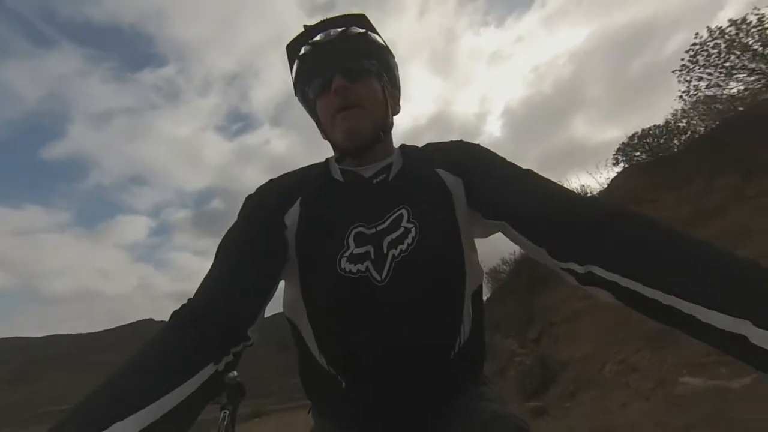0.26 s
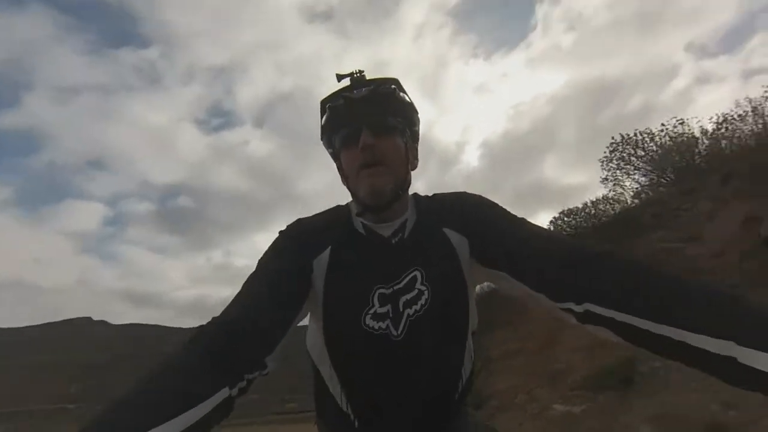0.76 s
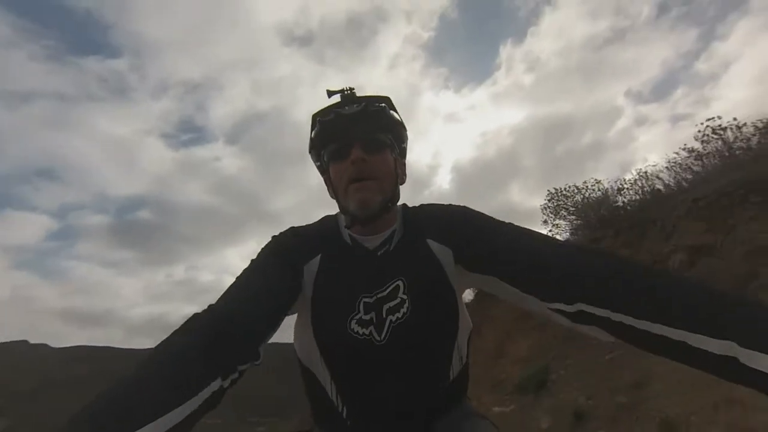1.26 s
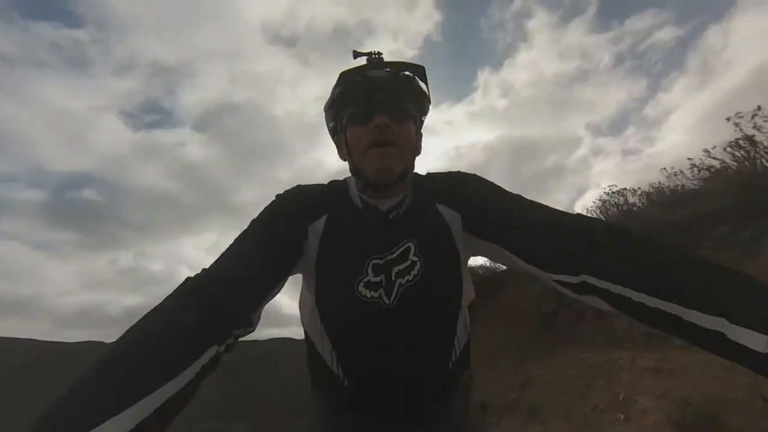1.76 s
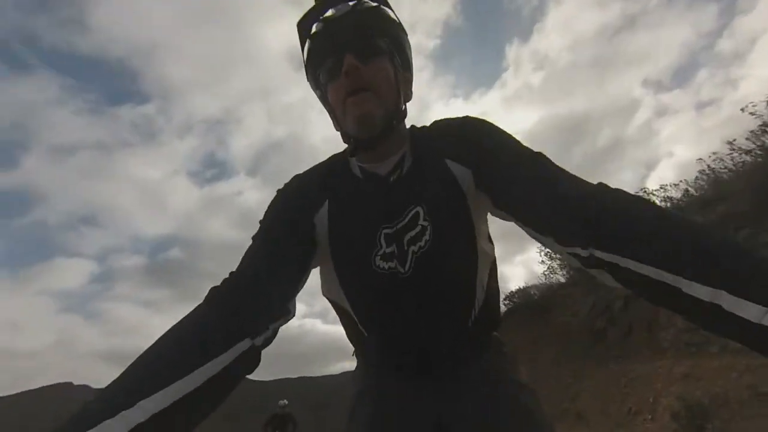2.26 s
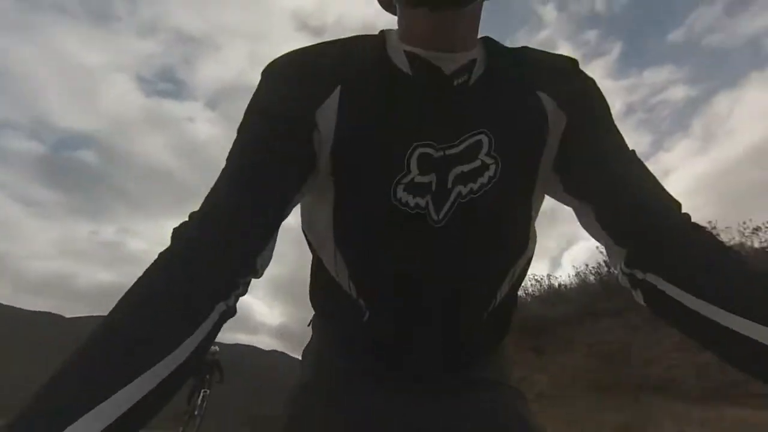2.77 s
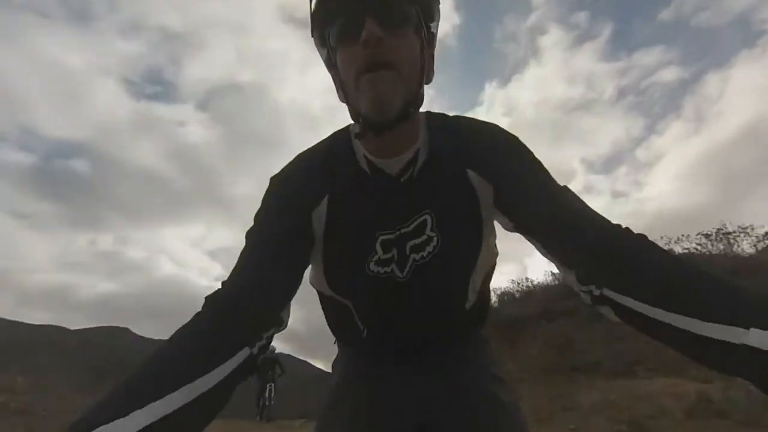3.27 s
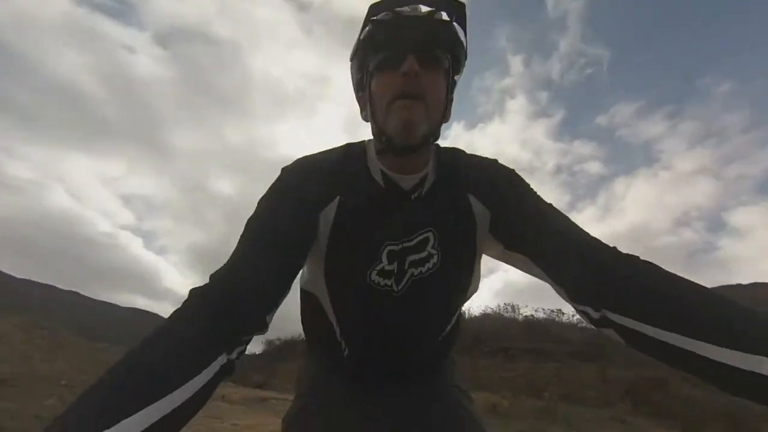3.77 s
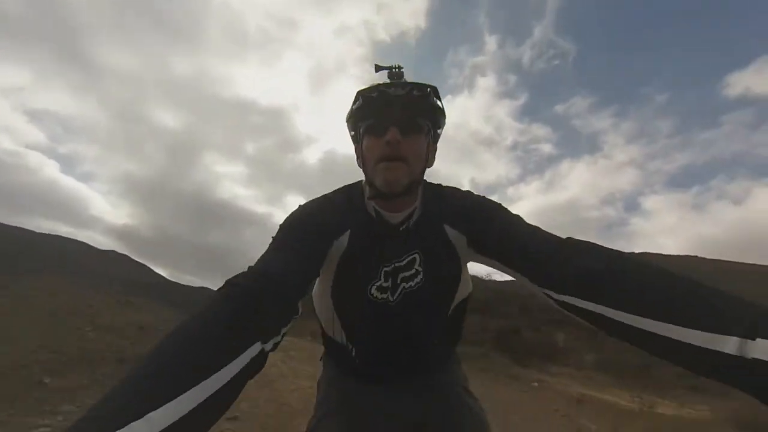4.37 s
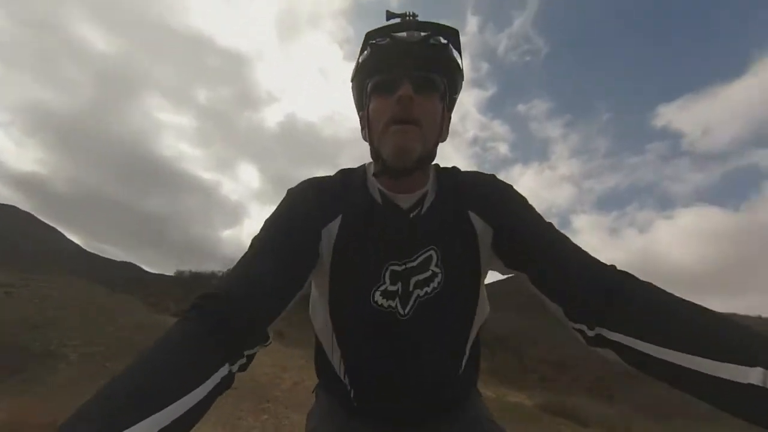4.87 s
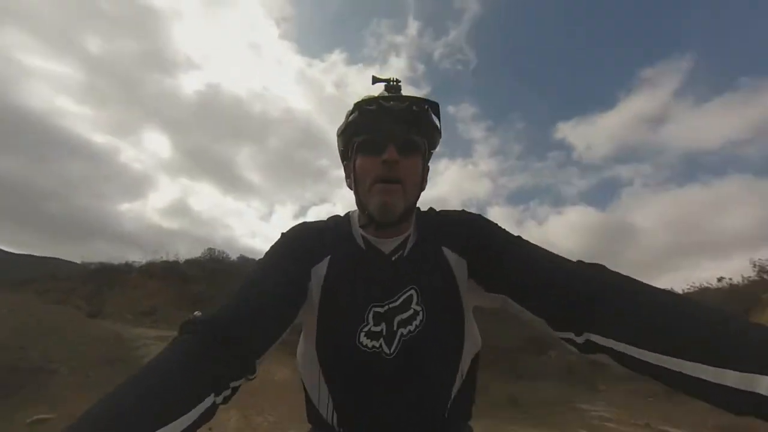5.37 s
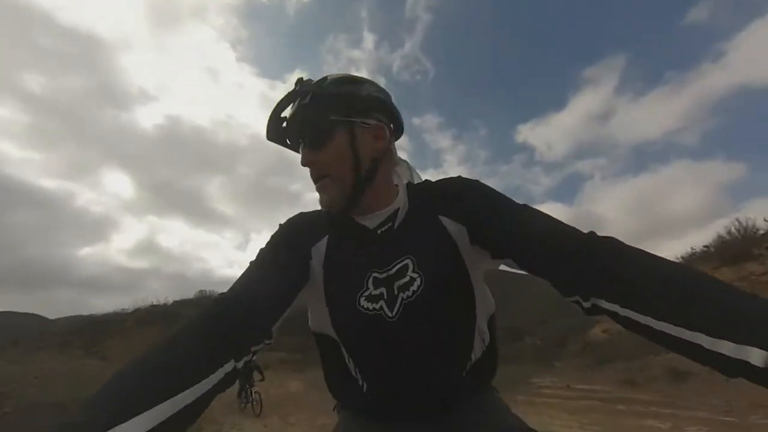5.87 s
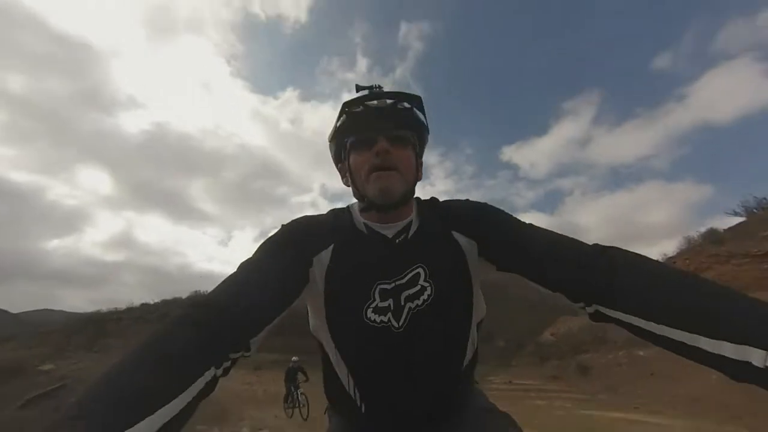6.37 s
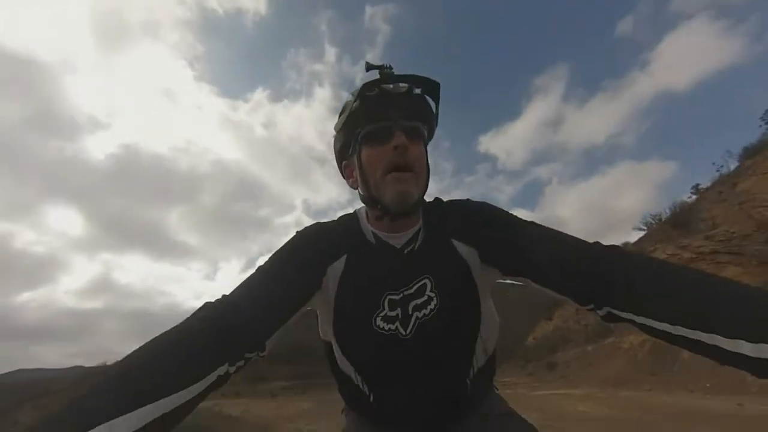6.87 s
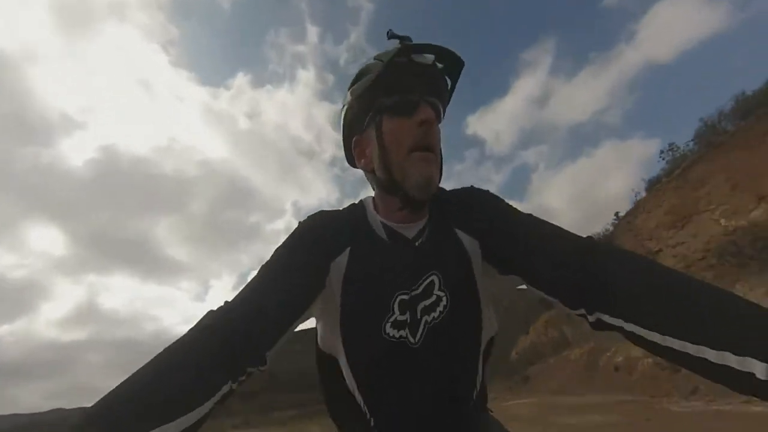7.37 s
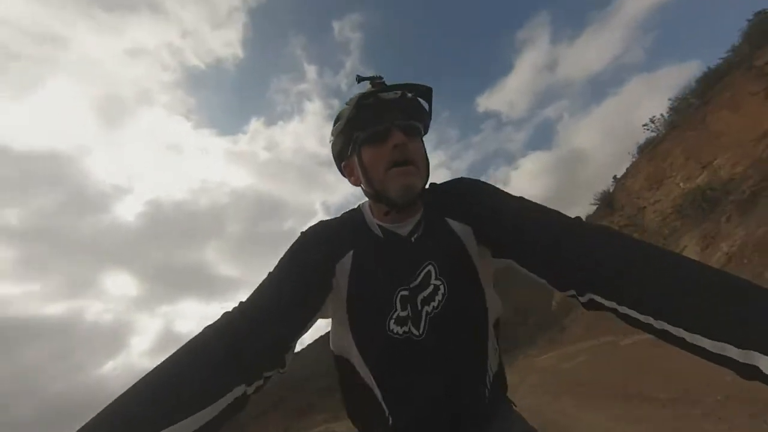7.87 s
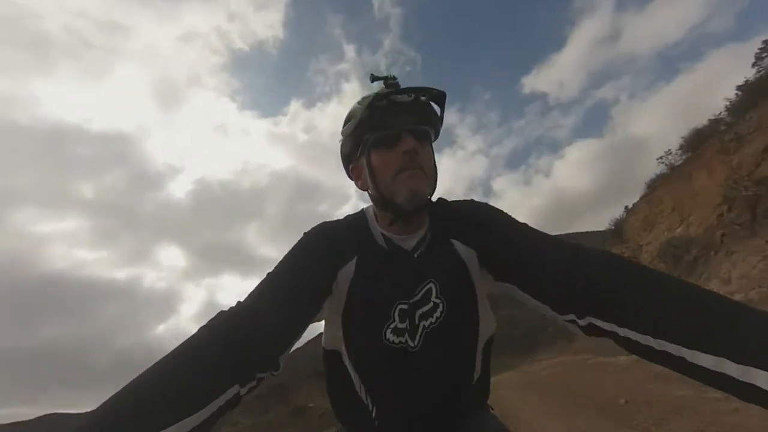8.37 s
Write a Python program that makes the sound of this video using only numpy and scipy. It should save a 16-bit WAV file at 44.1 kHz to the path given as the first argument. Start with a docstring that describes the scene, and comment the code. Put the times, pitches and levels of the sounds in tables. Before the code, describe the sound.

After a quiet rattling start, a bumpy bike ride turns into harsh, close plastic knocking and clattering, with dull thuds and tiny ticks.

```python
"""Hard knocks of a camera, loose in its plastic housing on a bicycle handlebar, about one per sway of the mount:
impulse pairs ring the shell's modes. The ride over rough ground starts gently with noise-driven rattle and
sway of the mount, and light contacts that ring small parts. Dull thuds (short swelling sines), taps of a
corner and ticks of a latch (crackles that ring stiff modes) accompany the knocks; the loudest peaks clip."""
import sys
import numpy as np
from scipy import signal
from scipy.io import wavfile
from scipy.ndimage import uniform_filter1d

SR = 44100
rng = np.random.default_rng(int(sys.argv[2]) if len(sys.argv) > 2 else 0)


def generate_wav(sig):
    """Save sig (samples, or channels by samples) to the path in sys.argv[1] as 16-bit PCM at SR."""
    pcm = np.round(np.clip(np.atleast_2d(sig).T, -1, 1) * 32767).astype(np.int16)
    wavfile.write(sys.argv[1], SR, pcm)


N = 380583  # samples


def undb(db):
    """Level law: decibels to an amplitude ratio."""
    return 10 ** (np.asarray(db) / 20)


def unit(x):
    """Normalisation to an effective (RMS) value of 1."""
    return x / np.sqrt(np.mean(x ** 2))


def ring(x, hz, t60):
    """Modal decay: a damped oscillator in sine phase, driven by x, falls 60 dB in t60 seconds."""
    pole = np.exp(2j * np.pi * hz / SR - np.log(1000) / (t60 * SR))
    return signal.lfilter([0, pole.imag], [1, -2 * pole.real, abs(pole) ** 2], x)


def band(x, hz, width):
    """Resonance: a band-pass peak applied twice."""
    b, a = signal.iirpeak(hz, hz / width, SR)
    return signal.lfilter(b, a, signal.lfilter(b, a, x))


def blows(seconds, size):
    """Impulsive excitation: each impulse is shared between two samples to place it between them."""
    out = np.zeros(N + 2)
    place = np.clip(seconds * SR, 0, N)
    whole = place.astype(int)
    np.add.at(out, whole, size * (1 - place + whole))
    np.add.at(out, whole + 1, size * (place - whole))
    return out[:N]


def walk(rate):
    """Slow random modulation: levels held for 1 / rate seconds, smoothed twice, with spread 1."""
    hold = int(SR / rate)
    steps = np.repeat(rng.standard_normal(N // hold + 1), hold)[:N]
    return unit(uniform_filter1d(uniform_filter1d(steps, hold), hold))


def struck(seconds, size, modes, scatter_db, crack_s):
    """Modal excitation: every blow is a brief crackle that rings the same modes in a different mix."""
    mix = undb(scatter_db * rng.standard_normal((len(seconds), len(modes))))
    fade = np.exp(-1 / (crack_s * SR))
    grit = 0.33 * rng.standard_normal(N)
    out = 0
    for k, (hz, db, t60) in enumerate(modes):
        hit = blows(seconds, size * undb(db) * mix[:, k])
        crackle = grit * signal.lfilter([0, 1], [1, -fade], hit)
        out = out + (-1) ** k * ring(hit + crackle, hz, t60)
    return out


DELAY_SPREAD_S, TAKEN_S = 0.001, 0.008  # a listed event this near takes the place of a companion


def company(listed, delay_s, rule, least_db, pause_s, next_s):
    """Coupled impacts: listed events, plus a companion to each strong knock that has none listed.

    A companion needs a knock above least_db, more than pause_s after the last and under next_s before the next."""
    s, db = np.transpose(KNOCKS)
    base_db, slope, spread_db = rule
    chance = rng.standard_normal((2, len(s)))
    rows = np.array(listed)
    at = s + delay_s
    rested = np.diff(s, prepend=0) > pause_s
    followed = np.diff(s, append=N / SR) < next_s
    unlisted = np.abs(at[:, None] - rows[:, 0]).min(axis=1) > TAKEN_S
    free = (db > least_db) & rested & followed & unlisted
    level_db = base_db + slope * db + spread_db * chance[1]
    start_s = at + DELAY_SPREAD_S * chance[0]
    return np.r_[rows[:, 0], start_s[free]], np.r_[rows[:, 1], level_db[free]]


# shaking by the ground, a curve through points: start_s, level_db
GROUND = [(0.0, -45), (0.17, -52.5), (0.41, -45), (0.96, -51.5), (1.12, -42.5), (1.58, -45.5),
          (2.01, -39.5), (2.21, -41.5), (2.73, -34.5), (2.89, -39.5), (3.3, -33.5), (3.95, -34),
          (4.13, -36.5), (4.37, -33.5), (4.78, -37), (5.22, -32.5), (5.64, -35.5), (5.79, -31.5),
          (6.87, -36), (8.63, -36.5)]


def ground_shaking():
    """Level envelope: the shaking that drives rattle and light contacts, interpolated in decibels."""
    return np.interp(np.arange(N) / SR, *np.transpose(GROUND))


# clearest scrapes of the light rattle: start_s, level_db
SCRAPES = [(0.02, -40), (0.393, -23), (0.423, -27), (0.545, -31.5), (0.608, -27), (0.702, -29.5),
           (0.854, -26), (1.082, -23), (1.114, -23.5), (1.141, -24.2), (1.2, -25.5), (1.268, -28),
           (1.32, -25.5), (1.442, -15.5), (1.512, -24), (1.631, -22.5), (1.643, -21.5), (1.945, -25.5),
           (2.584, -22), (2.816, -21.5), (3.944, -17.5), (4.402, -16), (4.532, -19), (4.849, -21),
           (4.877, -22.5), (5.785, -23), (6.163, -19), (7.576, -17)]
# resonances the light rattle excites: pitch_hz, width_hz, level_db, scatter_db (between scrapes)
RATTLE = [(71, 65, -9.5, 0.5), (135, 89, -8, -1), (312, 280, -3.5, -2), (526.6, 208, 0, 4.5),
          (859, 310, -10, 4.5), (1055, 310, -20, 9.5), (1820, 800, -35.5, 10.5), (2700, 1520, -22.5, 5.5),
          (4230, 1800, -41, 4), (7500, 6200, -45, 1), (11500, 4700, -53, 8.5)]
RATTLE_PER_S = 300
STIR_DB, STIR_S = 3.0, 0.11  # limit of the rise around knocks, and its window
ROLLING_DB = -58  # least drive, from the rolling tyres


def rattle(level_db):
    """Resonance under random excitation: scrape bursts and an even buzz of noise drive the shell.

    Knocks stir the rattle up around them, but it dips after a hard knock seats the camera."""
    s, db = np.transpose(KNOCKS)
    knock = blows(s, undb(db))
    seated = signal.lfilter([1], [1, -np.exp(-1 / (0.031 * SR))], knock)
    stirred = uniform_filter1d(knock, int(STIR_S * SR)) * STIR_S * SR
    busy = undb(level_db + STIR_DB * np.tanh(stirred) - 7.2 * np.minimum(seated, 1))
    surge = walk(30)

    count = int(RATTLE_PER_S * N / SR)
    small_s = rng.random(count) * N / SR
    small = undb(2.5 * np.minimum(rng.exponential(size=count), 3.0)) * busy[(small_s * SR).astype(int)]
    clear_s, clear_db = np.transpose(SCRAPES)
    seconds = np.r_[small_s, clear_s - 0.002, s]  # each knock leaves grit too
    size = np.r_[small, undb(clear_db), undb(db - 19)]

    colour = rng.standard_normal((len(seconds), len(RATTLE)))
    rise, fall = np.exp(-1 / (0.0019 * SR)), np.exp(-1 / (0.0031 * SR))
    out = 0
    for k, (hz, width, band_db, scatter_db) in enumerate(RATTLE):
        power = blows(seconds, (size * undb(scatter_db * colour[:, k])) ** 2)
        power = signal.lfilter([1], [1, -fall ** 2], power)
        power = signal.lfilter([1 - rise], [1, -rise], power)
        drive = np.sqrt(power + (0.63 * busy) ** 2)  # scrapes over the even buzz
        # the treble comes and goes the most
        drive = drive * undb(surge * (0.8 + 0.9 * np.log2(1 + hz / 410.0)))
        drive = np.hypot(drive, undb(ROLLING_DB)) * rng.standard_normal(N)
        out = out + undb(band_db) * np.sqrt(SR / width / 2) * band(drive, hz, width)
    return out


# swing of the mount, a curve through points: start_s, level_db
SWAY = [(0, -41), (1.85, -39), (2.69, -36.5), (2.95, -46), (3.03, -33), (4.18, -37), (4.59, -31),
        (4.85, -41.5), (5.02, -30.5), (6.13, -39.5), (6.85, -35), (7.33, -32), (7.64, -32), (8.63, -41)]
SWAY_HZ, SWAY_WIDTH_HZ = 31.4, 14.3


def sway_level():
    """Level envelope: the swing of the mount, interpolated in decibels."""
    return np.interp(np.arange(N) / SR, *np.transpose(SWAY))


def sway(level_db):
    """Forced resonance: the mount, pushed by the ground, swings at its own low pitch."""
    return unit(band(rng.standard_normal(N), SWAY_HZ, SWAY_WIDTH_HZ)) * undb(level_db)


def hiss():
    """White noise floor: the steady hiss of the microphone."""
    return undb(-84) * rng.standard_normal(N)


# clearest light contacts while the ride is still gentle: start_s, level_db
CONTACTS = [(0.0444, -49), (0.0628, -46), (0.1605, -48), (0.2853, -46), (0.4998, -50), (0.5824, -50),
            (0.7444, -52), (0.8844, -54), (1.0244, -52), (1.2844, -43), (1.3049, -45), (1.3533, -48),
            (1.6944, -41), (1.7868, -48), (1.8544, -43), (1.8701, -43), (1.9335, -39), (1.9694, -48),
            (1.9889, -42), (2.0168, -44), (2.0344, -47), (2.0844, -47), (2.1196, -48), (2.359, -44),
            (2.8055, -38.5)]
# modes the light contacts ring: pitch_hz, level_db, t60_s
LIGHT = [(1950, -9.5, .006), (2670, -4.5, 0.01), (3208, -3, 0.013), (4270, -9, 0.0058),
         (5230, -10.5, 0.0045)]
CHATTER_PER_S = 63  # two per sway
CHATTER_DB, CHATTER_SWELL_DB, CHATTER_SPREAD_DB = -13.0, 3.0, 4.0  # against the shaking


def light_contacts(level_db):
    """Modal ringing under repeated impact: unevenly timed small contacts swell and fade with the ground."""
    count = int(CHATTER_PER_S * N / SR) - 1
    chance = rng.standard_normal((2, count))
    jitter = np.clip(0.3 * chance[0], -0.5, 0.5)
    light_s = (np.arange(count) + 0.5 + jitter) / CHATTER_PER_S
    swell_db = level_db + CHATTER_SWELL_DB * walk(10)
    light_db = swell_db[(light_s * SR).astype(int)] + CHATTER_DB + CHATTER_SPREAD_DB * chance[1]
    clear_s, clear_db = np.transpose(CONTACTS)
    seconds, size = np.r_[clear_s, light_s], undb(np.r_[clear_db, light_db])
    return struck(seconds, size, LIGHT, scatter_db=3.0, crack_s=0.00052)


# loudest and lone dull landings and short rings of the shell: start_s, level_db, pitch_hz
THUDS = [(2.264, -16.5, 887), (2.412, -13.5, 280), (2.657, -15, 854), (2.711, -15.5, 830),
         (3.008, -10.5, 610), (3.313, -17.5, 915), (3.576, -17.5, 850), (3.63, -9.5, 246),
         (3.912, -12.5, 233), (3.961, -10, 270), (4.474, -9, 256), (4.592, -5, 238), (4.966, -16.9, 190),
         (5.036, -8.5, 220), (5.237, -19, 180), (5.549, -12, 179), (5.956, -6.5, 260), (6.023, -18.5, 830),
         (6.058, -18.5, 298), (6.096, -10, 272), (6.132, -15.5, 290), (6.176, -12.5, 213),
         (6.338, -18.5, 910), (6.35, -14.5, 148), (6.561, -10.5, 150), (7.137, -10, 170), (7.299, -11, 189),
         (7.356, -10.5, 204), (8.605, -11.0, 227)]
# companions: level_db after a 0 dB knock, dB per dB of knock, spread_db
THUD_RULE = (-16.5, 0.43, 3.2)
THUD_HZ, THUD_HZ_SPREAD = 205, 0.18  # centre and log spread of the companions' pitch


def thuds():
    """Heavily damped oscillation: soft landings, mostly just ahead of firm knocks, swell and die in milliseconds."""
    s, db = company(THUDS, -0.0125, THUD_RULE, least_db=-9.7, pause_s=0, next_s=np.inf)
    loose_hz = THUD_HZ * np.exp(THUD_HZ_SPREAD * rng.standard_normal(len(KNOCKS)))
    hz = np.r_[np.array(THUDS)[:, 2], loose_hz]
    t = np.arange(1000) / SR
    rise_s = 0.0017
    shape = t / rise_s * np.exp(1 - t / rise_s)
    out = np.zeros(N + len(t))
    for start, size, f in zip((s * SR).astype(int), undb(db), hz):
        out[start:start + len(t)] += size * shape * np.sin(2 * np.pi * f * t)
    return out[:N]


# loudest and lone pitched taps of a corner of the camera: start_s, level_db
TAPS = [(1.4501, -23.5), (2.2836, -23.5), (2.7301, -22), (3.5059, -27.5), (5.0043, -21), (5.1347, -22),
        (5.1732, -26), (7.357, -25.5), (8.0198, -23.5)]
# modes of that corner: pitch_hz, level_db, t60_s
CORNER = [(1855, -0.5, 0.015), (5240, -2.5, 0.0062), (11200, -16, .004)]
# companions: level_db after a 0 dB knock, dB per dB of knock, spread_db
TAP_RULE = (-29, 0.7, 3.1)


def corner_taps():
    """Modal ringing of a stiff part: a corner taps, also just ahead of hard knocks that follow a pause."""
    s, db = company(TAPS, -0.011, TAP_RULE, least_db=-6, pause_s=0.036, next_s=np.inf)
    return struck(s, undb(db), CORNER, scatter_db=1.0, crack_s=0.00023)


# hard knocks of the camera on the shell: start_s, level_db
KNOCKS = [(1.4605, -2), (1.4909, -15), (1.526, -4.5), (2.17, -16.5), (2.294, -2.5), (2.3188, -15.5),
          (2.4293, 1.3), (2.4649, -1.2), (2.498, -8), (2.5319, -2.5), (2.5634, -10.5), (2.7001, -14),
          (2.7381, -3.5), (3.022, 2), (3.1109, -4.5), (3.1742, -11.5), (3.2074, -2.5), (3.2502, -5),
          (3.284, -11), (3.3594, -18), (3.3736, -6), (3.4058, -7), (3.5153, -1.1), (3.547, -1.5),
          (3.6413, -13), (3.8636, -11), (3.926, -4.5), (3.9745, -5.5), (4.0548, -8.5), (4.211, -1),
          (4.243, -10), (4.3594, -13), (4.3924, -16.5), (4.4465, -3), (4.48, -4), (4.5704, -9),
          (4.6054, 0.7), (4.6387, -5.5), (4.6701, -4.5), (4.7028, -3.5), (4.7388, -6.5), (4.9992, -16),
          (5.014, -1.5), (5.0485, -2), (5.0777, -24), (5.1114, -0.9), (5.147, -7), (5.181, -5.5),
          (5.2142, -4), (5.2719, -7), (5.3628, -17), (5.4654, -2.5), (5.495, -8), (5.5277, 3),
          (5.5599, -3.5), (5.59, -12), (5.6235, -9.5), (5.7525, -8.5), (5.854, -3), (5.8782, -18),
          (5.974, 3), (6.007, -13), (6.1524, -19), (6.1931, 2.5), (6.3655, 4.2), (6.4196, -8),
          (6.4531, -10), (6.541, -5.5), (6.5769, -0.6), (6.8972, -14.5), (6.929, -11.5), (6.9938, -15.5),
          (7.1157, -10.5), (7.1472, 1), (7.1765, -0.2), (7.2368, 0.5), (7.262, -17), (7.2741, -2),
          (7.3082, -7.5), (7.3352, -11.5), (7.371, -1.5), (7.401, -0.5), (7.4371, -3), (7.5591, -5),
          (7.5926, -5.5), (7.626, -14), (7.8808, -16), (7.9433, -9), (8.0288, -2.3), (8.0624, -11.5),
          (8.1848, -14.5), (8.2233, -12.5), (8.3424, -18), (8.3735, -10.5), (8.4072, -3), (8.438, -15),
          (8.6193, -2.5)]
# modes of the shell: pitch_hz, level_db, t60_s, sign (at the microphone)
SHELL = [(215, 3, 0.0048, 1), (469, 0.5, 0.01, 1), (680, -24.5, 0.02, -1), (929, -8.5, 0.014, -1),
         (1224, -10.5, 0.019, -1), (1878, -2.5, 0.0042, -1), (2540, 4.5, 0.0024, 1), (2651, 0, 0.006, -1),
         (3000, -11, 0.0043, 1), (4150, -3.5, 0.007, -1), (4280, -19.5, 0.0022, 1)]
# bright treble modes of a hard edge, heard with each knock: pitch_hz, level_db, t60_s
EDGE = [(6110, -4, 0.0051), (7200, -2.5, 0.0052), (8300, -7, 0.0044), (10030, -1, 0.0035),
        (11600, 5, 0.0024), (13120, -0.5, 0.0024)]
CONTACT_S, RELEASE = 0.00094, 0.78  # mean contact time, and release against landing
SOFTNESS = 0.8743  # pole of the smoothing filter
SWAY_KICK_DB, SWAY_T60_S = -35, 0.066


def knocks():
    """Impact and release: paired impulses ring the shell; harder blows are brighter and kick the mount."""
    s, db = np.transpose(KNOCKS)
    mix = undb(1.14 * rng.standard_normal((len(s), len(SHELL))))
    contact_s = CONTACT_S * (1 + 0.039 * rng.standard_normal(len(s)))
    shell = 0
    for k, (hz, mode_db, t60, sign) in enumerate(SHELL):
        size = undb(db + mode_db) * mix[:, k] * np.sign(sign)
        push = blows(s, size) - RELEASE * blows(s + contact_s, size)
        shell = shell + ring(push, hz, t60)
    shell = signal.lfilter([1 - SOFTNESS], [1, -SOFTNESS], shell)  # plastic on plastic: a rounded push
    edge = struck(s + 0.0001972, undb(2.14 * db - 22.5), EDGE, scatter_db=3.0, crack_s=0.00024)
    mount = ring(blows(s, undb(db + SWAY_KICK_DB)), SWAY_HZ, SWAY_T60_S)
    # the shell is pulled the other way while the camera flies towards it: a decay run backwards
    fall = np.exp(-1 / (0.0059 * SR))
    pull = signal.lfilter([1], [1, -fall], blows(s, undb(db - 18.5))[::-1])[::-1]
    return shell + edge + mount - pull


# loudest and lone ticks of the latch: start_s, level_db
TICKS = [(2.72, -27), (3.231, -20.5), (3.6193, -22), (3.9547, -25.0), (4.5876, -20.5), (6.166, -25.5),
         (6.2109, -28), (6.388, -27), (6.5957, -26.5), (7.1308, -28), (7.2197, -30), (7.291, -20),
         (7.3496, -28), (7.4184, -21)]
# modes of the latch: pitch_hz, level_db, t60_s
LATCH = [(3110, -4, 0.0077), (4400, -7, 0.0084), (5220, -5, 0.004), (6470, -13, .006), (7320, -14, 0.0088),
         (9800, -21, 0.0074), (11000, -15, 0.0034), (13200, -25, .003)]
# companions: level_db after a 0 dB knock, dB per dB of knock, spread_db
TICK_RULE = (-31.5, 1, 4.6)


def latch_ticks():
    """Modal ringing of a small stiff part: the latch ticks, also half a sway after hard knocks within a run."""
    s, db = company(TICKS, 0.016, TICK_RULE, least_db=-6, pause_s=0, next_s=0.045)
    return struck(s, undb(db), LATCH, scatter_db=1.5, crack_s=0.00033)


SIDE_DB, SIDE_RUMBLE_DB = -61.5, -22  # flutter against the middle, rumble against the sway


def stereo(mid, sway_db):
    """Sum and difference: two nearly equal channels differ by a faint treble flutter and a low rumble."""
    brightened = mid + 57.0 * np.diff(mid, prepend=0)
    flutter = undb(SIDE_DB) * walk(300) * brightened
    rumble = undb(sway_db + SIDE_RUMBLE_DB) * unit(band(rng.standard_normal(N), 25.0, 31.0))
    side = flutter + rumble
    return np.array([mid + side, mid - side])


def scene():
    """Superposition: all sources add in the middle signal before it is spread to two channels."""
    rattle_db, sway_db = ground_shaking(), sway_level()
    mid = rattle(rattle_db) + sway(sway_db) + hiss() + light_contacts(rattle_db)
    mid = mid + thuds() + corner_taps() + knocks() + latch_ticks()
    return stereo(mid, sway_db)


TOP_HZ = 16000


def record(dry):
    """Overload and band limit: the converter clips at full scale, then a steep low-pass cuts the top."""
    low_pass = signal.ellip(10, 0.05, 80, TOP_HZ, fs=SR, output="sos")
    return signal.sosfilt(low_pass, np.clip(dry, -1, 1))


dry = scene()
out = record(dry)
generate_wav(out)
```